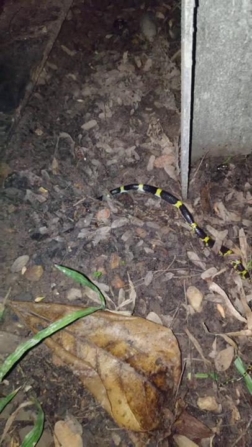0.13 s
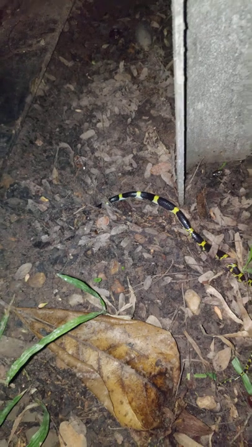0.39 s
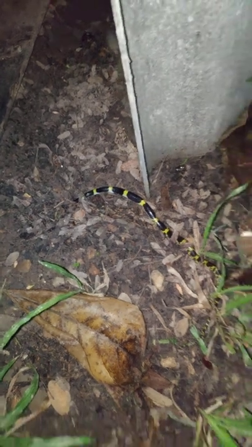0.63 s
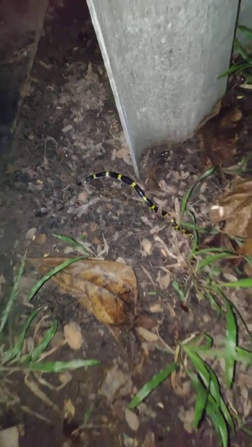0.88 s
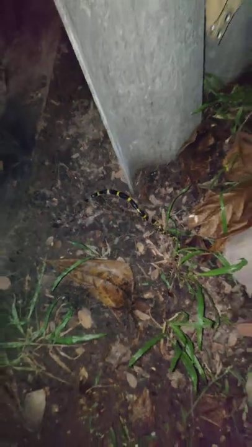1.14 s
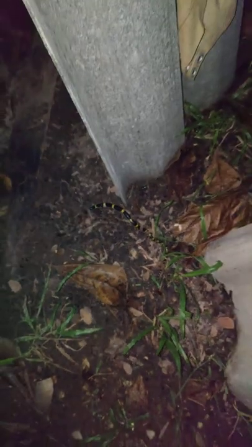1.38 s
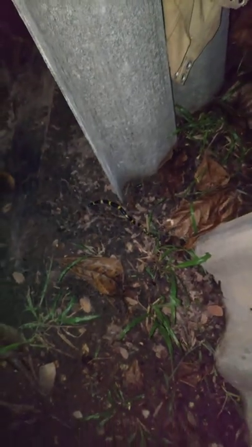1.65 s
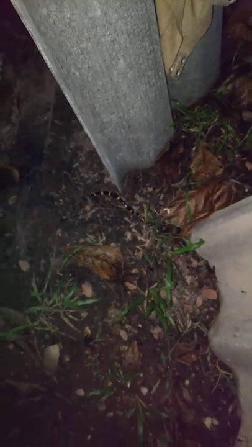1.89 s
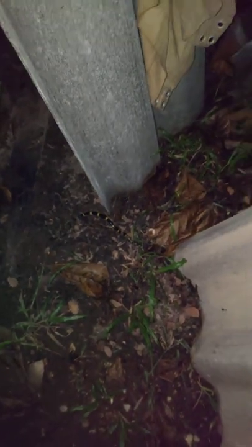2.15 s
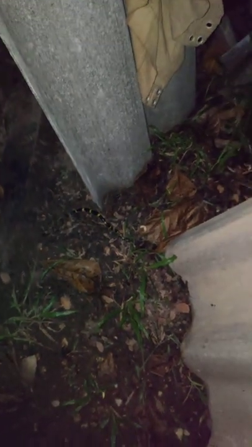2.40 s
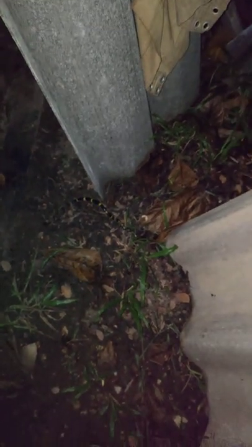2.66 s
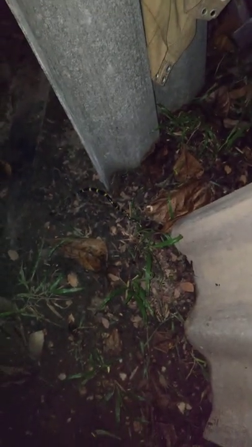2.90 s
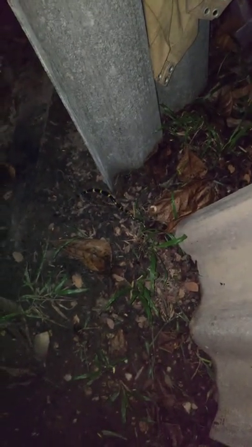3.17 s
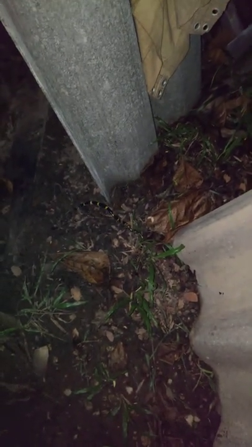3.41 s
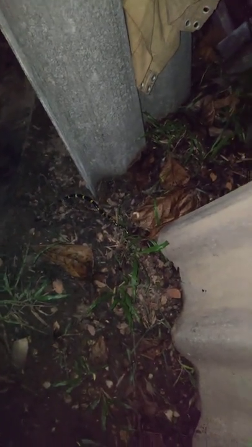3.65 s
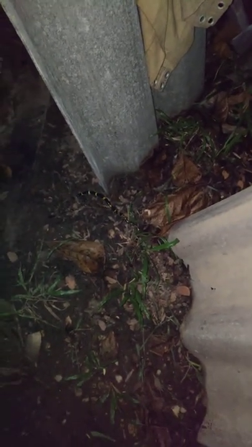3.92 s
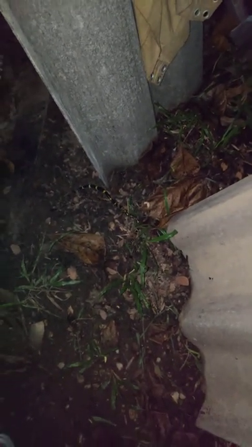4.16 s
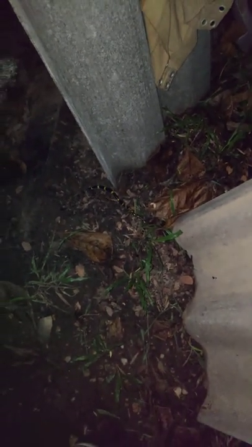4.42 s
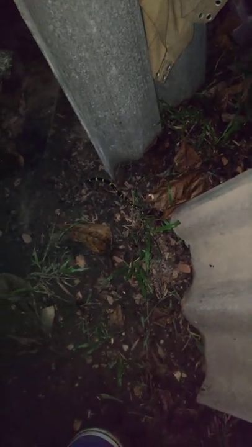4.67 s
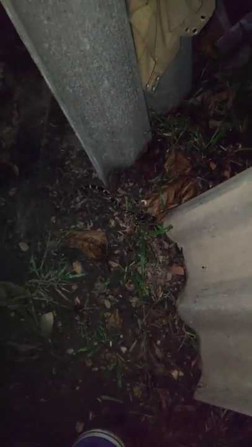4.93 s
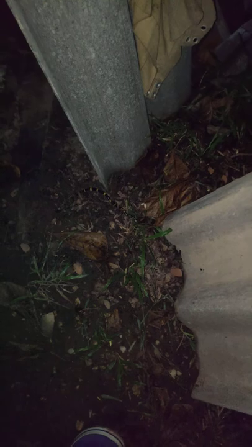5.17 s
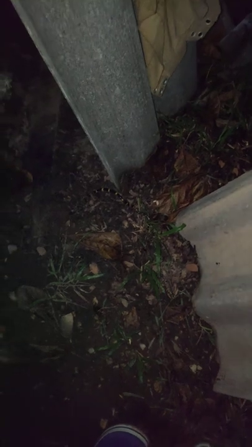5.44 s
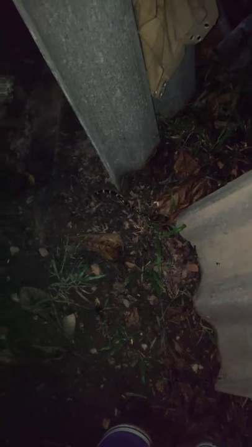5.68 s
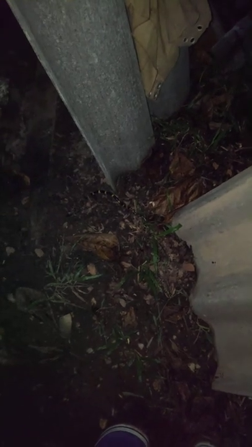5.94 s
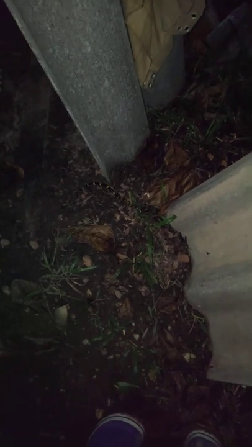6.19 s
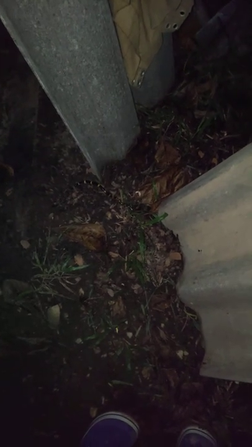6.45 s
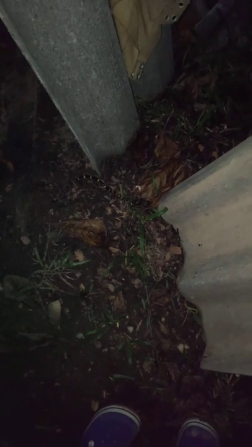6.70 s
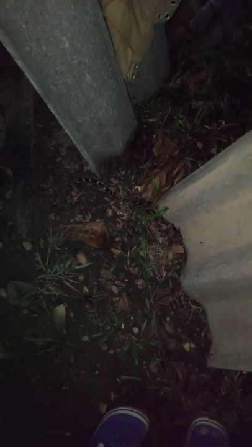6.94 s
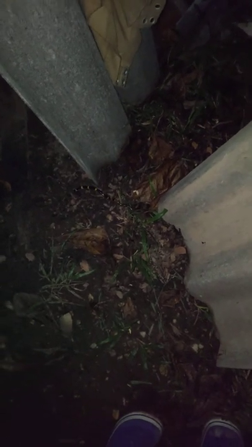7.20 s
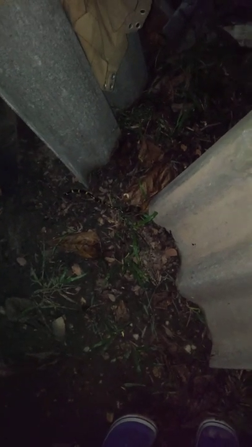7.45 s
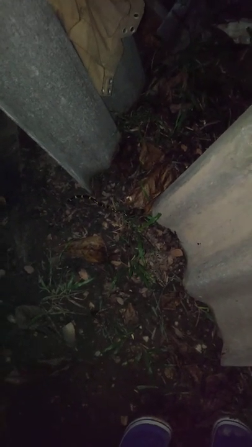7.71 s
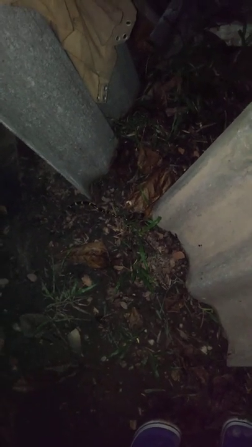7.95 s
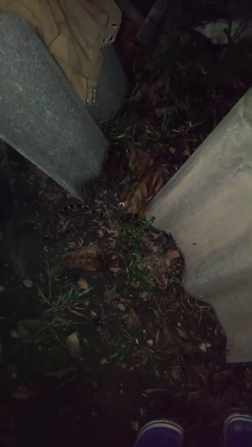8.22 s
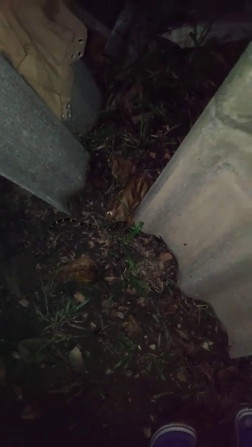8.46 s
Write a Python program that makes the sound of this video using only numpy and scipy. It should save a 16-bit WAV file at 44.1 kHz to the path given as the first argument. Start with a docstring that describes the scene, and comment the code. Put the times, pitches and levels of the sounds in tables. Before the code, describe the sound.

A wet garden at night in stereo. A distant frog chorus pulses throughout, with crickets trilling and chirping to the right and a high katydid buzz to the left, over a faint low hum. Small leaf snaps come first; then a nearer frog gives short rattles about once a second. Midway, feet crackle dry leaves on the left and a shoe briefly scrapes a hollow sheet. One last leaf snaps near the end.

```python
"""Night in a wet garden, on a stereo pair. Throughout: pulsed noise rings as a far frog pond, one purer piper
and crickets trilling and chirping to the right; rasped noise and a toothed file buzz as katydids to the left,
over the two tones of a far machine and coloured noise for still air. Leaves snap in the first moments; from
about 1 s a nearer frog rattles about once a second, and a second near frog once at 7.2 s, clicks ringing their
sacs, and faint fuzzy tones come and go. From 4 s feet crackle dry leaves on the left and a shoe slips on a
hollow sheet; near the end one last leaf snaps."""
import sys
import numpy as np
from scipy import signal
from scipy.fft import rfft, irfft, next_fast_len
from scipy.io import wavfile

SR = 44100
rng = np.random.default_rng(int(sys.argv[2]) if len(sys.argv) > 2 else 0)


def how_loud(loudness_db):
    """Turn decibels into a plain amplitude multiplier (0 dB gives 1, 20 dB gives 10)."""
    steps = np.asarray(loudness_db, float) / 20
    return 10 ** steps


def persist_wave(psi):
    """Save psi, clipped to +-1, as 16-bit WAV."""
    counts = np.round(np.clip(psi, -1, 1) * 32767).astype(np.int16)
    wavfile.write(sys.argv[1], SR, np.atleast_2d(counts).T)


N = 378819
SIZE = next_fast_len(N)
T = np.arange(N) / SR  # [s]
HZ = np.fft.rfftfreq(SIZE, 1 / SR)

# still air and far wash: (frequency [Hz], left density [dB per Hz], right density [dB per Hz])
AIR_SPECTRUM = [(20, -76.5, -76), (45.5, -76.5, -78), (69.5, -80.5, -80), (131, -87.5, -88.5),
                (250, -94.5, -94.5), (510, -101, -101), (835, -105, -105), (1150, -108, -108),
                (1410, -107, -106), (1950, -100, -99), (4010, -96, -93.5), (4970, -102, -97.5),
                (5750, -106, -99), (8800, -100, -100), (10260, -104, -104), (10900, -104, -110),
                (15100, -104, -118)]
# how alike the air is at both ports: (frequency [Hz], likeness [0-1])
AIR_LIKENESS = [(60, 0.94), (130, 0.97), (290, 0.82), (640, 0.19), (1400, .0)]
# far machine, before its unsteadiness: (time [s], lower tone [dB], upper tone [dB])
HUM_LEVELS = [(0.0, -65.5, -63.5), (.8, -64, -61), (1.4, -60.5, -67.5), (2.2, -60.5, -79),
              (3.3, -62, -64.5), (4.9, -59.5, -65.5), (6.5, -58, -67), (7.0, -59.5, -64.5),
              (7.8, -64.5, -73), (8.59, -61.5, -80)]
# middle pitches of its tones: (lower [Hz], upper [Hz])
HUM_TONES_HZ = (79.9, 100.1)
# faint fuzzy tones: (middle [s], half length [s], frequency [Hz], width [Hz], level [dB])
FAINT_TONES = [(1.33, .2, 1790, 30, -69), (1.55, .05, 1790, 25, -65), (1.35, .18, 1230, 120, -83),
               (5.1, .5, 232, 6, -78), (8.25, .45, 206, 5, -76), (7.6, .8, 740, 200, -81)]
# katydids at the left port: (time [s], buzz level [dB], throb depth [0-1])
KATYDID_BUZZ = [(0.0, -63, 0.1), (1.0, -59.5, 0.4), (1.6, -62.5, 0.3), (3.0, -61, 0), (4.8, -58.5, 0.3),
                (5.3, -58.5, 1), (8.59, -58.5, 0.6)]
# colour of the katydid hiss: (frequency [Hz], level [dB])
RASP_SPECTRUM = [(9000, -9), (10000, -8), (11500, -2), (12500, -3.5), (13700, -1), (14100, -5.5),
                 (15700, -16)]
# modes of the steady katydid's file: (frequency [Hz], width [Hz], level [dB])
FILE_MODES = [(11560, 180, -3), (12600, 930, -1), (13550, 600, -4)]
# chirps of the lone cricket, before panning: (middle [s], level [dB])
CRICKET_CHIRPS = [(0.07, -61.2), (0.308, -63.5), (0.57, -63), (0.805, -63.5), (1.065, -58.5), (1.306, -63),
                  (1.581, -61), (1.807, -66), (2.077, -63.5), (2.298, -62), (2.564, -63), (2.824, -60.5),
                  (3.106, -63), (3.35, -62), (3.604, -64), (3.85, -62.5), (4.106, -59), (4.36, -63),
                  (4.614, -62.6), (4.863, -63), (5.113, -62), (5.352, -64), (5.604, -61), (5.859, -63),
                  (6.117, -62), (6.357, -62), (6.617, -60), (6.865, -61), (7.102, -60.5), (7.36, -62),
                  (7.608, -62.5), (7.885, -64), (8.118, -63), (8.375, -59.2)]
# trilling crickets at the right port: (time [s], level [dB])
TRILL_LEVEL = [(0.0, -55), (2.0, -52.5), (8.59, -52.3)]
# wing modes of a middle-sized cricket: (frequency [Hz], width [Hz], level [dB])
WING_MODES = [(6503, 510, -0.5), (7100, 730, -8.5), (7850, 1440, -10.5)]
# swell of the pond crowd: (time [s], level [dB])
CROWD_LEVEL = [(0.0, -54), (.25, -50.5), (.8, -53.5), (1.0, -53), (1.2, -49), (1.55, -53), (2.2, -48),
               (2.6, -53), (3.2, -50), (3.7, -53.5), (4.4, -49), (5.15, -46.5), (5.6, -50), (6.0, -50.5),
               (6.4, -47), (6.6, -50.5), (6.8, -47), (7.05, -51.5), (7.4, -47), (7.8, -52), (8.2, -52.5),
               (8.45, -50.5)]
# upper, middle and lower voice of a middle-sized pond frog: (frequency [Hz], width [Hz])
FROG_MODES = [(3422, 310), (2970, 490), (1806, 164)]
# the same voices: (level over crowd [dB], share of its swell, level over a bout [dB], left over right [dB])
VOICE_MIX = [(0, 0.94, -9, -1.5), (-12.5, 0.77, 0.5, 0.8), (-19.5, .8, -10.5, 2)]
# bouts of joint rasping: (peak time [s], level [dB])
RASPING_BOUTS = [(.1, -64.5), (.98, -59), (1.9, -57.5), (2.83, -55), (3.75, -55), (4.68, -56), (5.15, -58),
                 (5.68, -57), (6.2, -58), (6.66, -54), (7.32, -55), (7.72, -56), (8.33, -58)]
# shoe jerks: (peak time [s], level [dB])
SHOE_JERKS = [(4.755, -56.5), (4.791, -54.5), (4.87, -68)]
# modes of the scuffed sheet: (frequency [Hz], width [Hz], level [dB])
SHEET_MODES = [(452, 60, -4), (619, 70, 1), (800, 110, -5), (960, 110, -10), (1130, 110, -9),
               (1500, 400, -21)]
# leaves underfoot: (start [s], length [s], level [dB], left over right [dB], share of low crunch [0-1])
LEAF_RUSTLES = [(4.09, 0.2, -50.5, 18, 0.34), (4.182, 0.088, -53, 18, 0.13), (4.451, 0.098, -43, 23, 0.24),
                (4.497, 0.33, -53, 24, 0.28), (4.794, 0.16, -50.5, -3, 0.99), (4.883, 0.093, -53, 16, 0.24),
                (5.374, .06, -57, 16, 0), (0.192, .04, -58, 16, .05), (.555, .04, -54, 16, 0.1),
                (1.565, .04, -58, 16, .05)]
# single leaves snapping: (time [s], relative level [dB])
LEAF_SNAPS = [(0.0974, -52), (0.2049, -44), (0.5581, -43), (0.5721, -41.5), (0.9203, -44), (1.1887, -47),
              (1.5778, -48), (4.1639, -37), (4.1964, -46), (4.2394, -50), (4.4654, -47), (4.4844, -38),
              (4.5084, -44), (4.6224, -37), (4.9232, -42), (5.0005, -43), (8.3035, -36)]
# near frogs, one row a rattle; the soft one at 7.233 s comes from a second frog close by: # (first pulse [s],
# pulses, level [dB], left over right [dB], lowest mode against the upper ones [dB])
FROG_RATTLES = [(.93, 7, -52, 0, -8), (1.793, 8, -46, -4, -12), (2.772, 6, -45, 3, -12),
                (3.71, 9, -39, 7, -12), (4.609, 7, -38, 3, -12), (5.603, 8, -43, 1, -5),
                (6.598, 8, -43, 2, -4), (7.233, 6, -51, 1, -2), (7.661, 8, -41, 7, -9),
                (8.558, 1, -43, 5, -7)]
# upper modes of its vocal sac: (frequency [Hz], width [Hz], level [dB])
SAC_MODES = [(2250, 500, -5), (2780, 600, -1), (3330, 420, 3)]
# lowest mode of the sac, its resonance applied twice: (frequency [Hz], width of each [Hz])
SAC_LOW_MODE = (1780, 480)


def evened(x):
    """Scales to rms 1."""
    return x / np.sqrt(np.mean(x ** 2) + 1e-20)


def read(points, hz, column=1):
    """Reads a spectrum on a log-frequency axis."""
    table = np.transpose(points)
    return np.interp(np.log(hz + 1), np.log(table[0] + 1), table[column])


def curve(rows, column=1):
    """Reads a control over time."""
    table = np.transpose(rows)
    return np.interp(T, table[0], table[column])


def pan(db):
    """Left and right gains for a level difference, left over right."""
    return how_loud([[db / 2], [-db / 2]])


def colour(x, gain):
    """Filters by a complex gain over frequency."""
    return irfft(rfft(x, SIZE) * gain, SIZE)[..., :N]


def mode(hz, width):
    """Steep resonance: one pole applied twice."""
    return 1 / (1 + 2j * (HZ - hz) / width) ** 2


def body(modes, factor=1):
    """Several resonances side by side, neighbours in opposite phase; factor shifts their pitch."""
    return sum((-1) ** k * how_loud(db) * mode(hz * factor, width)
               for k, (hz, width, db) in enumerate(modes))


def waver(top_hz):
    """Slow random drift of rms 1: twenty sines of random phase, weaker as they quicken."""
    coarse = T[::64]
    sines = sum(np.sin(2 * np.pi * (f * coarse + rng.random())) / np.sqrt(f)
                for f in np.geomspace(top_hz / 20, top_hz, 20))
    return evened(sines).repeat(64)[:N]


def singers(per_s, spread, blur_s, count):
    """Regular pulses from afar: leaves scatter each into a short dying burst, another one at each ear."""
    rates = per_s * rng.uniform(1 - spread, 1 + spread, count)
    power = sum(np.exp(-2 * ((T * r + rng.random()) % 1) / (r * blur_s)) for r in rates)
    return np.sqrt(power) * rng.standard_normal((2, N))


def air():
    """Still air: coloured noise, shared by both ports in the bass, unrelated above, gently uneven."""
    shared, apart = rng.standard_normal((2, N))
    same = np.clip(read(AIR_LIKENESS, HZ), -1, 1)
    densities_db = [read(AIR_SPECTRUM, HZ), read(AIR_SPECTRUM, HZ, column=2)]
    left_gain, right_gain = how_loud(densities_db) * np.sqrt(SR / 2)
    left = colour(shared, left_gain)
    right = colour(shared, same * right_gain) + colour(apart, np.sqrt(1 - same ** 2) * right_gain)
    return np.array([left, right]) * how_loud(1.32 * waver(3))


def hum():
    """A far machine: two low sine tones, slightly unsteady in level and pitch."""
    out = np.zeros(N)
    for k, hz in enumerate(HUM_TONES_HZ):
        level = np.sqrt(2) * how_loud(curve(HUM_LEVELS, column=k + 1) + 1.84 * waver(8))
        cycles = np.cumsum(hz + 0.686 * waver(2)) / SR
        out += level * np.sin(2 * np.pi * cycles)
    return out


def tones():
    """Faint narrow bands of noise swell and fade here and there."""
    out = np.zeros((2, N))
    for middle, half, hz, width, db in FAINT_TONES:
        swell = how_loud(db) * np.exp(-((T - middle) / half) ** 4)
        out += swell * evened(colour(rng.standard_normal((2, N)), mode(hz, width)))
    return out


def katydids():
    """Katydids to the left: a throbbing hiss of many rasps, and one file whose teeth give a comb of lines."""
    teeth_per_s = 174.9 * (1 + .001 * waver(20))
    teeth = np.diff(np.floor(np.cumsum(teeth_per_s) / SR), prepend=0)
    comb = how_loud(-9) * evened(colour(teeth, body(FILE_MODES)))
    throb = np.exp(-((T - 5.63) * 9.35 % 1) / 0.28)  # 9.35 sharp rises a second
    depth = np.clip(curve(KATYDID_BUZZ, column=2), 0, 1)
    rasps = rng.standard_normal((2, N)) * (1 + depth * (.8 * throb - .25))
    hiss = evened(colour(rasps, how_loud(read(RASP_SPECTRUM, HZ)) * (HZ > 8000)))
    return how_loud(curve(KATYDID_BUZZ)) * how_loud([[0], [-16]]) * (hiss + comb)


def chirper():
    """A high cricket, a little right: four chirps a second of a few wing strokes, faintly echoed by the trees."""
    gate = np.zeros(N)
    for s, db in CRICKET_CHIRPS:
        near = slice(max(int((s - .1) * SR), 0), int((s + .4) * SR))
        since = T[near] - s
        strokes = 0.41 + np.exp(-((since + 0.067) * 36.0 % 1) / 0.78)  # 36 strokes a second
        chirp = strokes * np.exp(-(since / 0.048) ** 4)
        echo = how_loud(-10.0) * (since > 0) * np.exp(-abs(since) / 0.45)
        gate[near] += how_loud(db) * (chirp + echo)
    ring = evened(abs(mode(8820, 330)))
    return colour(gate * rng.standard_normal((2, N)), ring) * pan(-2.6)


def trill(count=3):
    """Crickets to the right stroke their wings without pause, about 51 times a second, and ring wing modes."""
    wings = np.zeros((2, N))
    for size in np.linspace(-1, 1, count):
        strokes = singers(51, .015, blur_s=0.039, count=2)
        wings += colour(strokes, body(WING_MODES, 1 + 0.019 * size))
    return how_loud(curve(TRILL_LEVEL)) * how_loud([[-9.5], [0]]) * evened(wings)


def chorus(count=6):
    """Far pond frogs: groups of slightly different size take turns leading; deeper voices rise in short bouts."""
    sizes = np.linspace(-1, 1, count)
    drives = []
    for size in sizes:
        lead = how_loud(2.43 * waver(4) - 2.6 * size ** 2)
        drives.append(rfft(lead * singers(23, .12, blur_s=0.031, count=4), SIZE))
    crowd_db = curve(CROWD_LEVEL)
    mean_db = crowd_db.mean()
    rise_s, fall_s = 0.075, 0.23
    bout_power = sum(how_loud(2 * db) * np.exp(-((T - s) / np.where(T < s, rise_s, fall_s)) ** 2)
                     for s, db in RASPING_BOUTS)
    out = np.zeros((2, N))
    for (hz, width), (db, share, bout_db, pan_db) in zip(FROG_MODES, VOICE_MIX):
        spectrum = sum(d * mode(hz * (1 + 0.059 * size), width) for d, size in zip(drives, sizes))
        voice = evened(irfft(spectrum, SIZE)[:, :N])
        steady = how_loud(db + mean_db + share * (crowd_db - mean_db))
        level = np.sqrt(steady ** 2 + how_loud(2 * bout_db) * bout_power)
        out += level * how_loud(1.0 * waver(8)) * pan(pan_db) * voice
    return out


def piper():
    """One frog with a purer voice, a narrow resonance, stands out of the crowd as a thin wavering strand."""
    voice = colour(singers(23, .05, blur_s=.05, count=1), mode(3564, 70))
    below_crowd_db = -12
    return how_loud(curve(CROWD_LEVEL) + below_crowd_db + 2.3 * waver(2)) * evened(voice)


def scuff():
    """A shoe drags briefly on a hollow sheet: quick, nearly regular slips and grit ring its low modes."""
    slips_per_s = 160 * (1 + .08 * waver(40))
    slips = np.diff(np.floor(np.cumsum(slips_per_s) / SR), prepend=0)
    grit = 0.076 * rng.standard_normal(N)
    rise_db_per_s, fall_db_per_s = 800, 402
    stroke = sum(how_loud(db - abs(T - s) * np.where(T < s, rise_db_per_s, fall_db_per_s))
                 for s, db in SHOE_JERKS)
    return stroke * evened(colour(slips + grit, body(SHEET_MODES)))


def leaves():
    """Dry leaves: dense random crackle under each step and single snaps; bright and mostly to the left."""
    grains_db = 2.0 * np.minimum(rng.exponential(1, N // 40 + 1), 4)
    crackle = rng.standard_normal((2, N)) * how_loud(grains_db).repeat(40)[:N]
    crisp, crunch = np.zeros((2, 2, N))
    for s, length, db, pan_db, low in LEAF_RUSTLES:
        u = np.clip((T - s) / length, 0, 9)
        push = how_loud(db) * np.minimum(8 * u, 1) * np.exp(-2.5 * u ** 2)
        crisp += push * np.clip(1 - low, 0, 1) * how_loud([[0], [-pan_db]])
        crunch += push * low * pan(pan_db / 4)
    bright, dull = mode(13000, 7900), mode(3900, 5900) * (HZ > 600)
    rustle = crisp * evened(colour(crackle, bright)) + crunch * evened(colour(crackle, dull))
    snaps = np.zeros(N)
    decay = np.exp(-np.arange(60) / 14)  # in samples
    for s, db in LEAF_SNAPS:
        snaps[int(s * SR):][:60] += how_loud(db + 7) * rng.standard_normal(60) * decay
    return rustle + how_loud([[0], [-16]]) * colour(snaps, bright + 0.11 * dull)


def near_frogs():
    """Near frogs: sharp throat clicks ring the vocal sac, the low mode tiring first; the garden adds a short
    wash."""
    upper, lower = np.zeros((2, 2, N))
    pulse_gap_s = .0435
    for s, pulses, db, pan_db, low_db in FROG_RATTLES:
        k = np.arange(round(pulses))
        at = ((s + pulse_gap_s * k) * SR).astype(int)
        # the rattle swells to its third pulse, then sinks
        level_db = db - .22 * (k - 2.2) ** 2 + .8 * rng.standard_normal(10)[:len(k)]
        upper[:, at] = how_loud(level_db) * pan(pan_db)
        lower[:, at] = how_loud(level_db + low_db - .7 * k) * pan(3.)
    # each ring peaks at 1
    upper_ring, lower_ring = [gain / abs(irfft(gain, SIZE)).max()
                              for gain in (body(SAC_MODES), mode(*SAC_LOW_MODE) ** 2)]
    calls = colour(upper, upper_ring) + colour(lower, lower_ring)
    tail = rng.standard_normal((2, N)) * how_loud(-60 * T / 0.26) * (T > .004)  # falls 60 dB in 0.26 s
    wash = how_loud(-6) / np.linalg.norm(tail[0])
    return colour(calls, 1 + wash * rfft(tail, SIZE))


def scene():
    """All voices of the night, with the steps, the machine and the air."""
    animals = chorus() + piper() + near_frogs() + trill() + chirper() + katydids()
    return animals + leaves() + scuff() + tones() + hum() + air()


def roll_off(x):
    """The treble ends steeply here."""
    return signal.sosfilt(signal.butter(12, 15830, fs=SR, output="sos"), x)


def record(dry):
    """A small stereo recorder: nothing passes from 15750 Hz up."""
    mix = colour(dry, HZ < 15750)
    return roll_off(mix)


dry = scene()
out = record(dry)
persist_wave(out)
```